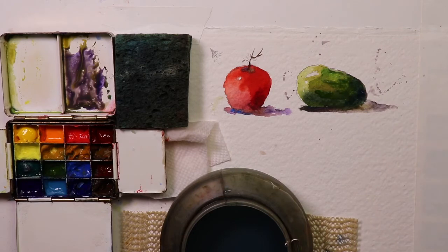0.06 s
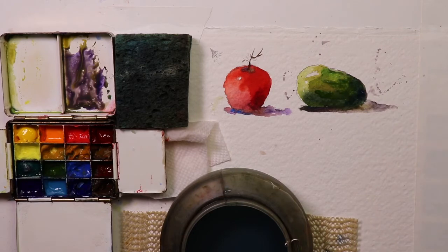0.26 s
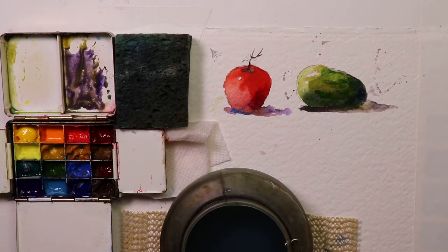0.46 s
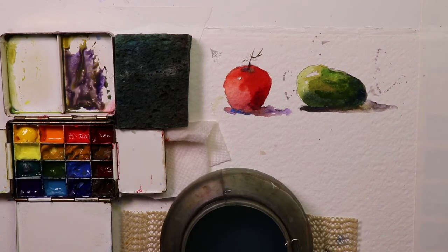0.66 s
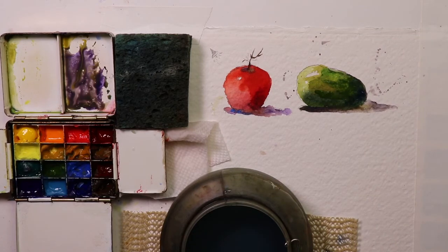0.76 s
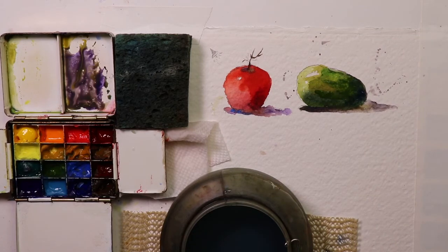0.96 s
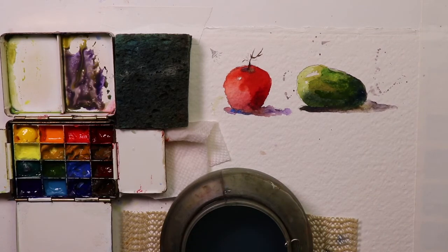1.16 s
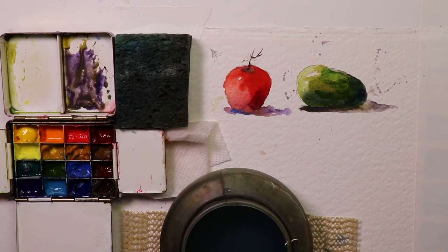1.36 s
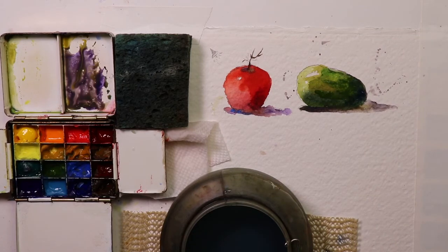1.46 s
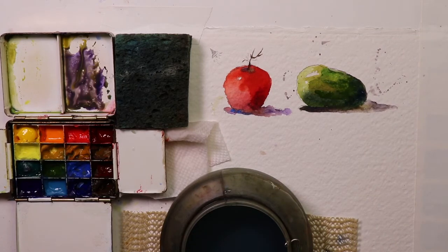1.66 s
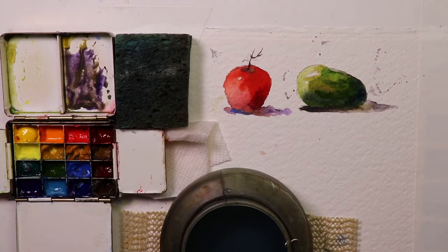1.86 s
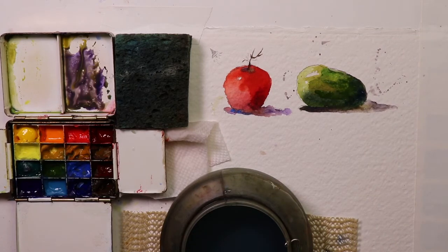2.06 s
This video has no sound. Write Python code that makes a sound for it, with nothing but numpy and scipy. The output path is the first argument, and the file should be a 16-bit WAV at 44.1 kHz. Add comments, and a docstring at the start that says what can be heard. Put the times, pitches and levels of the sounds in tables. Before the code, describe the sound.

A brush is rinsed in a glass water jar, with a soft desk knock, tiny watery clicks and a plip, then one sharp tap on the glass; faint cloth rustle ends it. Close microphone, small quiet room.

```python
"""A soft knock makes the desk boom, over low room noise, hum and hiss in a small, quiet room.
A watercolour brush is rinsed in a glass water jar: wet clicks of shaped noise, gliding sine bubbles,
a ringing plip and tiny resonant droplets. Its handle then taps the glass, a noise crack and bounce
over ringing jar modes and a thud. A soft noise rustle, probably a sleeve, grows at the end."""
import sys
import numpy as np
from scipy import signal
from scipy.fft import rfft, irfft
from scipy.io import wavfile

SR = 44100
rng = np.random.default_rng(int(sys.argv[2]) if len(sys.argv) > 2 else 0)


def file_out(sig):
    """Save sig as 16-bit WAV at sys.argv[1]."""
    # one column per channel
    cols = np.atleast_2d(sig).T
    # limit, then scale
    lim = np.clip(cols, -1, 1)
    pcm = np.round(lim * 32767).astype(np.int16)
    wavfile.write(sys.argv[1], SR, pcm)


N = 92345  # length in samples

TAP_S = 0.7493  # when the handle meets the glass
JAR_BUILD_S = 0.0014  # time constant of the jar's onset

# Ringing modes of the glass jar. Each row: pitch in Hz, level at the tap in dB, 60 dB decay in seconds.
JAR_MODES = [(475.2, -35, 0.21), (628, -32.5, 0.03), (839, -33, 0.037), (1101, -39.5, 0.053),
             (1425, -34, 0.028), (1901, -18.5, 0.087), (2576, -31.5, 0.074), (3367, -17, 0.07),
             (3495, -27.5, .15), (3517, -24.5, 0.078), (3683, -20, 0.075), (4013, -26, 0.051),
             (4440, -31, 0.064), (5391, -29.5, 0.07), (5815, -27.5, .07), (6130, -27, 0.068),
             (6810, -20, 0.047)]
# Stereo width of the room noise, hiss and rustle. Each row: frequency in Hz, side minus middle in dB.
FLOOR_WIDTH = [(60, -20.5), (150, -20.5), (380, -13), (950, -3.5), (2380, -5), (5980, 0.5), (15000, -6)]


def from_db(db):
    """Decibels to gain."""
    return 10 ** (np.asarray(db) / 20)


def rms_one(x):
    """Scale to rms 1."""
    return x / np.sqrt(np.mean(x ** 2) + 1e-20)


def since(s):
    """Seconds since a moment, zero before it."""
    return np.maximum(np.arange(N) / SR - s, 0)


def envelope(s, attack_s, hold_s, t60):
    """Quick rise, hold, then an exponential fall of 60 dB in t60 seconds."""
    t = since(s)
    rise = 1 - np.exp(-t / attack_s)
    fall_db = -60 * np.maximum(t - hold_s, 0) / t60
    return rise * from_db(np.maximum(fall_db, -300))


def at_hz(points):
    """Gain of a (Hz, dB) curve at every FFT frequency, drawn straight over log frequency."""
    hz, db = np.transpose(points)
    bins_hz = np.arange(N // 2 + 1) * SR / N
    return from_db(np.interp(np.log(np.maximum(bins_hz, 1)), np.log(hz), db))


def coloured(x, points):
    """Filter by a (Hz, dB) curve."""
    return irfft(rfft(x) * at_hz(points), N)


def noise(colour):
    """Noise of a given spectrum, rms 1."""
    return rms_one(coloured(rng.standard_normal(N), colour))


def band_noise(hz, octaves):
    """Noise in one band, rms 1; keeping only its sign between two filterings evens out its level."""
    edges = np.clip([hz * 2 ** (-octaves / 2), hz * 2 ** (octaves / 2)], 20, 0.48 * SR)
    sos = signal.butter(2, edges, "band", fs=SR, output="sos")
    band = signal.sosfilt(sos, rng.standard_normal(N))
    return rms_one(signal.sosfilt(sos, np.sign(band)))


def stereo(colour, width):
    """Noise shared by both sides, plus a second noise of opposite sign left and right."""
    middle = noise(colour)
    side = coloured(noise(colour), width)
    return middle + side * [[1], [-1]]


def ring(modes, s, build_s):
    """Struck modes: decaying sines, alternating in sign."""
    out = np.zeros(N)
    for k, (hz, db, t60) in enumerate(modes):
        sine = np.sin(2 * np.pi * hz * since(s))
        out += (-1) ** k * from_db(db) * envelope(s, build_s, 0, t60) * sine
    return out


def background():
    """Steady low room noise, hiss above it and a low sine hum."""
    # Spectra of the room noise and the hiss. Each row: frequency in Hz, relative level in dB per Hz.
    floor_colour = [(12, -48), (20, -13), (32, -13), (43, -2), (64, 0.5), (80, -12.5), (113, -1),
                    (152, -11), (201, -5.5), (279, -7.5), (313, -20.5), (345, -12.5), (427, -23),
                    (471, -11), (583, -21.5), (1000, -25), (1300, -58), (2200, -120)]
    hiss_colour = [(590, -31), (1000, -6.5), (1100, -0.5), (1350, -4), (1500, -2.5), (1740, -5), (2830, -2),
                   (4040, -6), (11200, -6.5), (15100, -5), (15800, -8.5)]
    floor_db, hiss_db = -57.5, -62
    hum_hz, hum_db = 60, -62
    room_noise = from_db(floor_db) * stereo(floor_colour, FLOOR_WIDTH)
    hiss = from_db(hiss_db) * stereo(hiss_colour, FLOOR_WIDTH)
    hum = from_db(hum_db) * np.sin(2 * np.pi * hum_hz * since(0))
    return room_noise + hiss + hum


def room(x):
    """A short diffuse tail from the desk and near walls: the sound convolved with decaying noise."""
    # Colour of the tail. Each row: frequency in Hz, relative level in dB.
    tail_colour = [(100, 4), (500, -1.5), (1500, 3), (3500, -0.5), (6200, 0.5), (9000, -9), (16000, -4)]
    # Stereo width of the tail. Each row: frequency in Hz, side minus middle in dB.
    tail_width = [(200, -31), (500, -22), (1500, -46), (3500, -50), (7000, -33), (14000, 3)]
    room_db, room_t60_s, room_delay_s = -13, 0.17, 0.00514
    tail = stereo(tail_colour, tail_width) * envelope(room_delay_s, 0.00054, 0, room_t60_s)
    tail = tail[:, :SR // 2] / np.sqrt(np.sum(tail ** 2) / 2)  # unit energy per side, on average
    return from_db(room_db) * signal.fftconvolve(x[None], tail, axes=1)[:, :N]


def rustle():
    """Cloth slides softly: a dull noise body with a brighter brushing on top, each with its own swell."""
    # The swell. Each row: time in seconds, level of the body in dB, level of the treble in dB.
    swell = [(1.4, -78, -89), (1.7, -67.5, -75), (1.81, -61, -74), (1.87, -62, -63), (1.91, -58.5, -64),
             (1.94, -58.5, -59), (1.97, -62, -68.5), (2.09, -58.5, -63.5)]
    # Spectra of body and treble. Each row: frequency in Hz, relative level in dB per Hz.
    body_colour = [(100, -9), (300, 2), (550, -4.5), (1000, -13), (2000, -14), (16000, -44)]
    treble_colour = [(300, -29), (1000, 2), (1600, -4), (2100, 1.5), (2700, -6.5), (4300, -5.5),
                     (9000, -16), (16000, -27)]
    s, body_db, treble_db = np.transpose(swell)
    body = from_db(np.interp(since(0), s, body_db)) * stereo(body_colour, FLOOR_WIDTH)
    treble = from_db(np.interp(since(0), s, treble_db)) * stereo(treble_colour, FLOOR_WIDTH)
    return body + treble


def desk():
    """The modes of the desk top boom at the knock, and faintly at the tap."""
    # Each row: pitch in Hz, level at the knock in dB, 60 dB decay in seconds.
    desk_modes = [(33.2, -43.5, 1), (86, -38, 0.71), (127, -30.5, 0.27), (190, -39.5, .15)]
    knock_s, shaken_by_tap_db = 0.0, -18.5
    knocked = -ring(desk_modes, knock_s, 0.00046)
    shaken = from_db(shaken_by_tap_db) * ring(desk_modes, TAP_S, 0.012)
    return knocked + shaken


def droplets():
    """Faint random ticks excite resonators at many pitches, thickest in the middle of the stirring."""
    stir_s, stir_spread_s, peak_per_s = 0.27, 0.1, 160
    droplet_db, droplet_t60_s = -52, 0.0086
    stirring = np.exp(-0.5 * ((since(0) - stir_s) / stir_spread_s) ** 2)
    ticks = (rng.random(N) < peak_per_s * stirring / SR) * rng.standard_normal(N)
    pitches = np.geomspace(1800, 14000, 20)  # Hz
    dealt = rng.integers(0, len(pitches), N)  # which pitch each tick excites
    r = from_db(-60 / (droplet_t60_s * SR))  # decay per sample
    out = np.zeros(N)
    for k, w in enumerate(2 * np.pi * pitches / SR):
        excitation = ticks * (dealt == k) + 1e-18  # the tiny offset avoids denormal numbers
        out += signal.lfilter([0, np.sin(w)], [1, -2 * r * np.cos(w), r * r], excitation)
    return from_db(droplet_db) * out


def clicks():
    """Short wet noise snaps of the bristles; each also sets the jar ringing faintly."""
    # Each row: start in seconds, level in dB, centre in Hz, width in octaves, 60 dB decay in seconds.
    snaps = [(0.0213, -49, 7300, 0.51, 0.028), (.0800, -53, 4400, 2.35, 0.049),
             (.1220, -51.5, 12100, 0.54, 0.018), (.2240, -54, 2500, 1.57, 0.11),
             (0.2385, -44, 14300, .3, .018), (0.26, -49, 4300, 1.9, 0.054),
             (0.2794, -41, 4900, 1.57, 0.028), (0.2795, -30.5, 1640, 0.79, 0.027),
             (0.3094, -47.5, 4250, 1.1, 0.025), (0.3353, -41, 12300, 0.56, 0.042),
             (.3558, -40, 2820, 1.42, 0.051), (.3560, -42.5, 7300, 0.64, 0.031),
             (0.3965, -51, 4700, 3, .02), (0.4097, -35, 4200, 0.43, 0.022),
             (0.4107, -40.5, 3350, 2.4, 0.022), (.4412, -48.5, 3600, 0.35, 0.038),
             (.4435, -51.5, 12300, .5, 0.035)]
    hold_s, into_jar_db = 0.00044, 1.5
    coupling_hz = 1900  # clicks above this pitch move the glass less
    out = np.zeros(N)
    jar = ring(JAR_MODES, 0, JAR_BUILD_S)
    for s, db, hz, octaves, t60 in snaps:
        out += from_db(db) * envelope(s, 0.00015, hold_s, t60) * band_noise(hz, octaves)
        start = int(s * SR)
        jar_gain = from_db(db + into_jar_db) * min(1, coupling_hz / hz)
        out[start:] += jar_gain * jar[:N - start]
    return out


def bubbles():
    """Each bubble rings briefly as a sine rising in pitch."""
    # Each row: start in seconds, first pitch in Hz, level in dB, 60 dB decay in seconds,
    # rise as a share of the first pitch per second.
    bubble_rows = [(0.0805, 3024, -30.5, 0.026, 1.3), (.0810, 857, -51, 0.068, .3),
                   (.2470, 703, -35, 0.052, 10), (0.34, 3370, -28, 0.024, .8),
                   (0.4132, 846, -46, 0.052, 0.35), (.4408, 5560, -40, 0.023, 0.73),
                   (.4630, 4020, -32.5, 0.026, .8)]
    build_s = 0.0024
    out = np.zeros(N)
    for s, hz, db, t60, rise in bubble_rows:
        t = since(s)
        cycles = hz * t * (1 + rise * t / 2)  # integral of the rising pitch
        out += from_db(db) * envelope(s, build_s, 0, t60) * np.sin(2 * np.pi * cycles)
    return out


def plip():
    """The main plip: a few short modes ring as the brush breaks the surface."""
    # Each row: pitch in Hz, level in dB, 60 dB decay in seconds.
    plip_modes = [(1417, -23.5, .025), (1493, -44, 0.17), (1880, -22.5, 0.018)]
    return ring(plip_modes, 0.2793, 0.00061)


def tap():
    """The handle cracks on the glass and bounces once; the jar rings and its foot thuds on its mat."""
    # Spectra of the dry crack and the bounce. Each row: frequency in Hz, relative level in dB per Hz.
    crack_colour = [(150, -20), (400, -10.5), (620, -26.5), (850, -5), (1100, -8), (1500, 0.5),
                    (2300, -15.5), (2850, -8.5), (3500, 0), (4700, -3), (6300, 7), (8500, -1), (11000, -3),
                    (15500, -11)]
    bounce_colour = [(500, -16.5), (2600, -10), (3500, -3), (4800, -6.5), (6300, -1), (9000, -11),
                     (15500, -20)]
    crack_db, crack_hold_s, crack_t60_s = -17.5, 0.0028, 0.026
    bounce_s, bounce_db, bounce_t60_s = 0.7567, -24, 0.019
    thud_db, thud_hz, thud_octaves, thud_t60_s = -41, 175.5, 0.74, 0.18
    crack = from_db(crack_db) * envelope(TAP_S, 0.00038, crack_hold_s, crack_t60_s) * noise(crack_colour)
    bounce = from_db(bounce_db) * envelope(bounce_s, 0.00027, 0.0011, bounce_t60_s) * noise(bounce_colour)
    thud = from_db(thud_db) * envelope(TAP_S, 0.0064, 0.016, thud_t60_s) * band_noise(thud_hz, thud_octaves)
    return crack + bounce + thud + ring(JAR_MODES, TAP_S, JAR_BUILD_S)


def scene():
    """The jar stands straight ahead of the microphone, and only its sounds feed the room tail."""
    jar = tap() + clicks() + plip() + bubbles() + droplets()
    return jar + room(jar) + desk() + rustle() + background()


def record(dry):
    """A steep elliptic low-pass cuts the top above 16 kHz."""
    return signal.sosfilt(signal.ellip(10, 0.2, 70, 16000, fs=SR, output="sos"), dry)


dry = scene()
out = record(dry)
file_out(out)
```